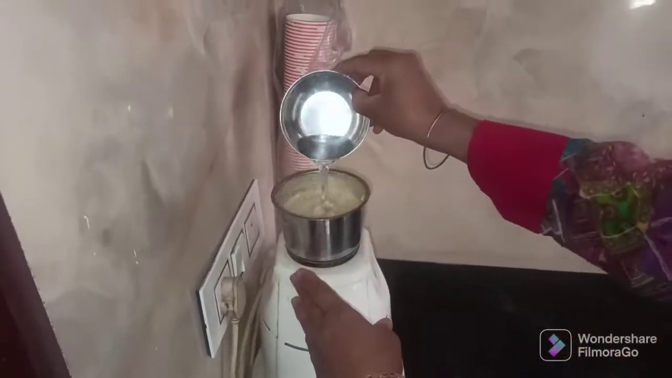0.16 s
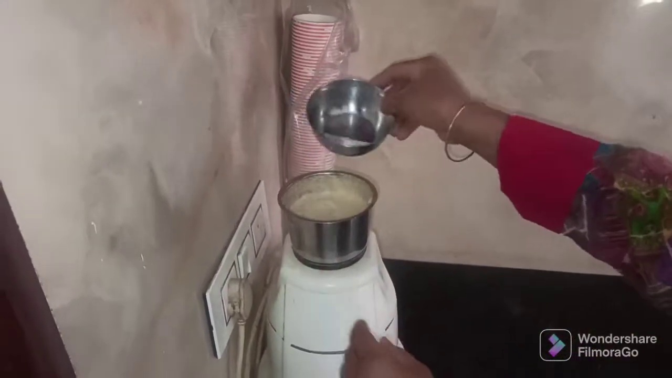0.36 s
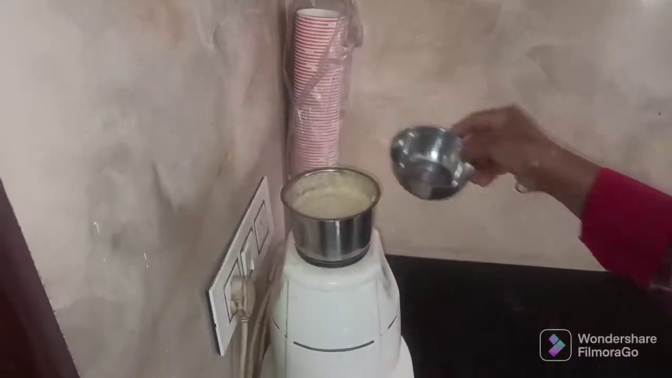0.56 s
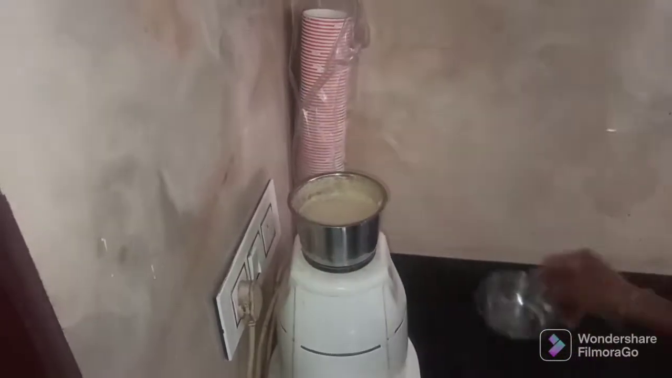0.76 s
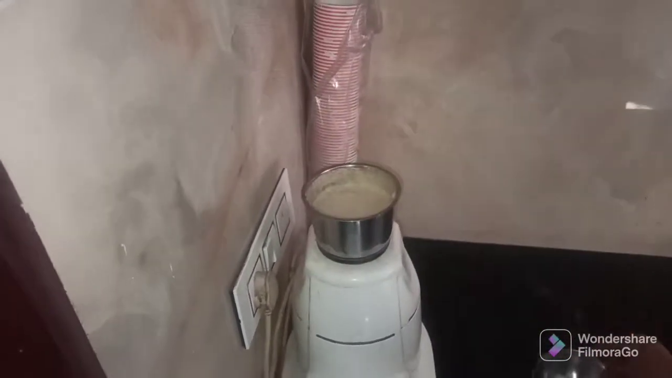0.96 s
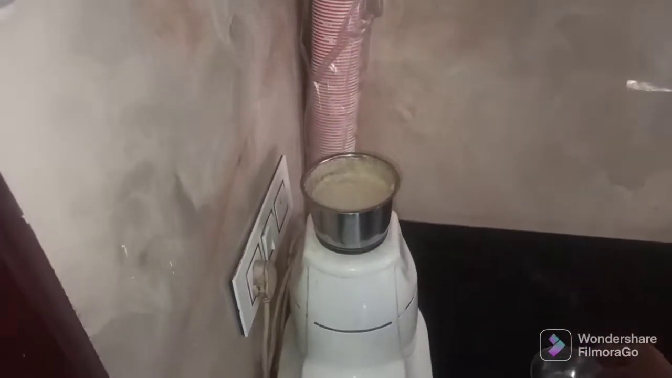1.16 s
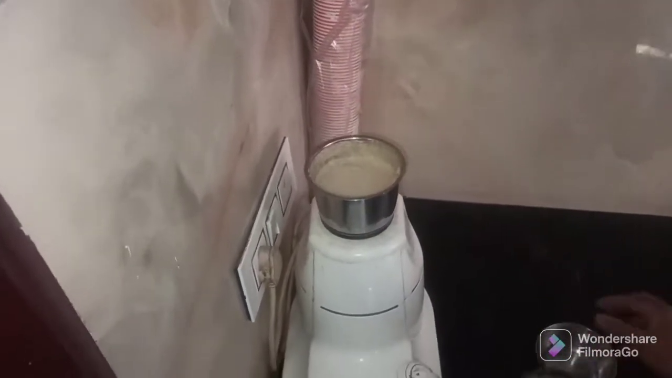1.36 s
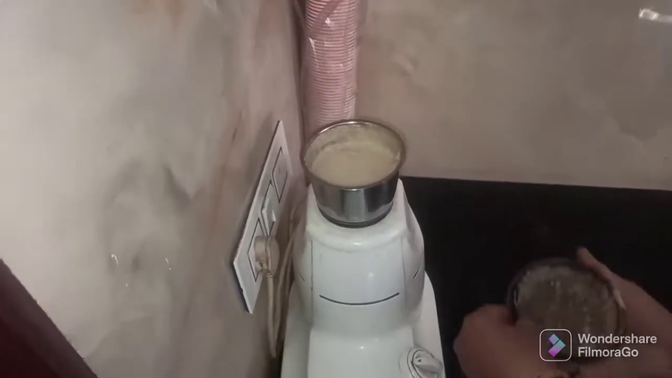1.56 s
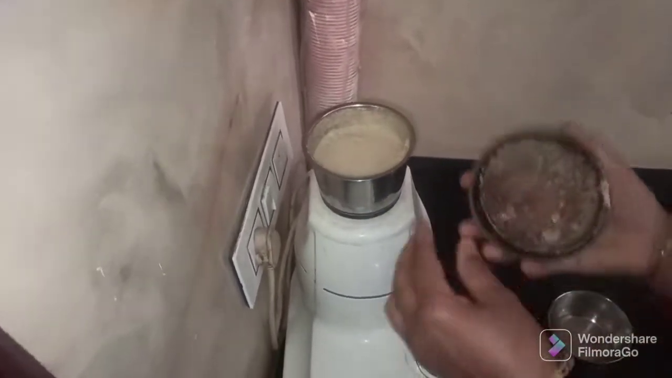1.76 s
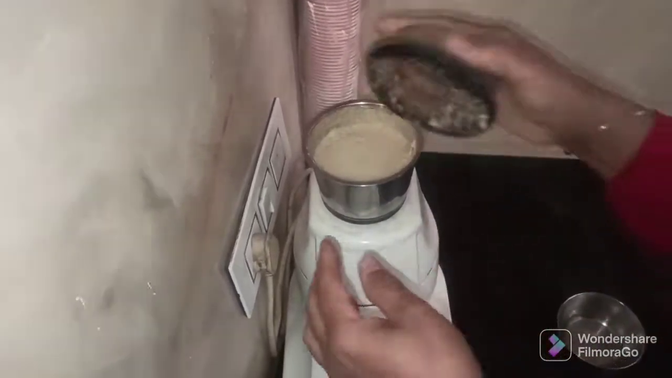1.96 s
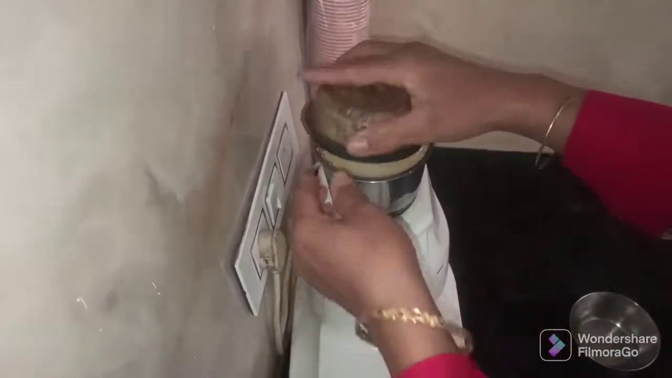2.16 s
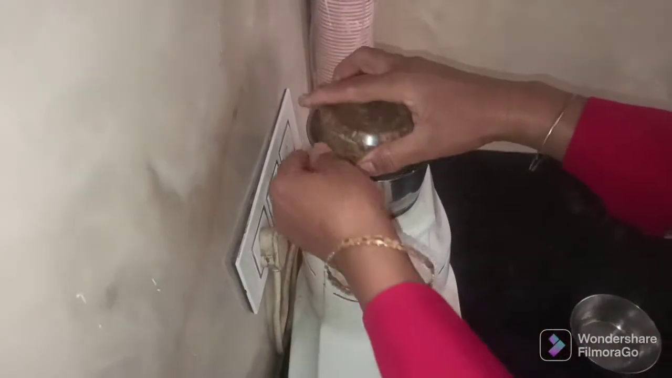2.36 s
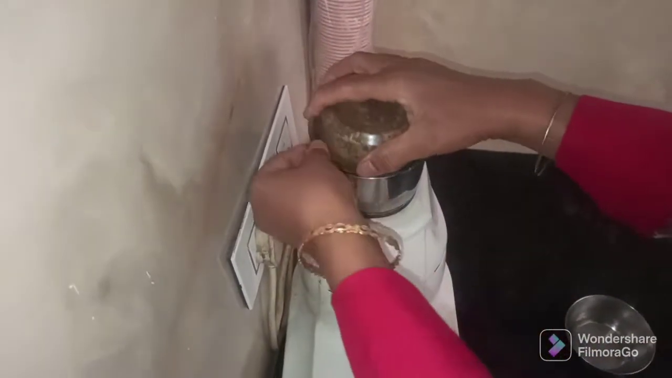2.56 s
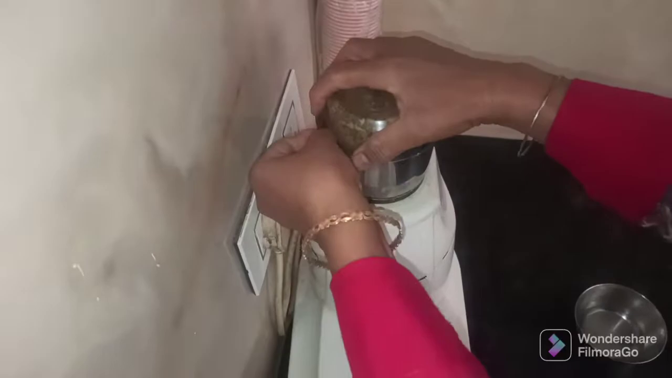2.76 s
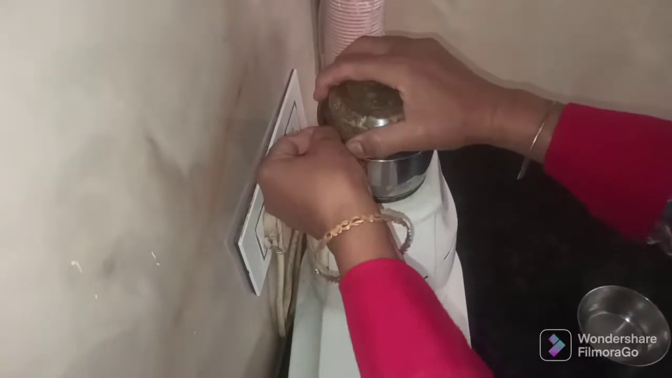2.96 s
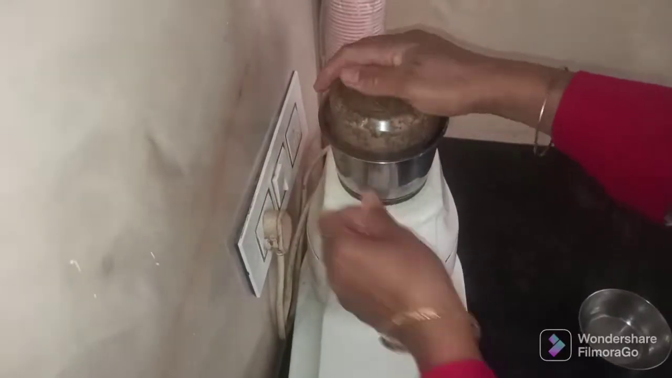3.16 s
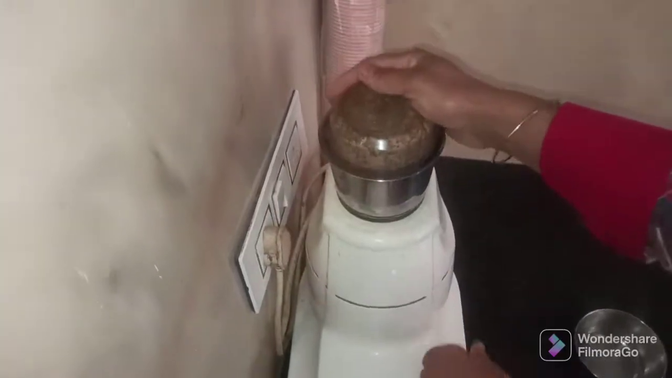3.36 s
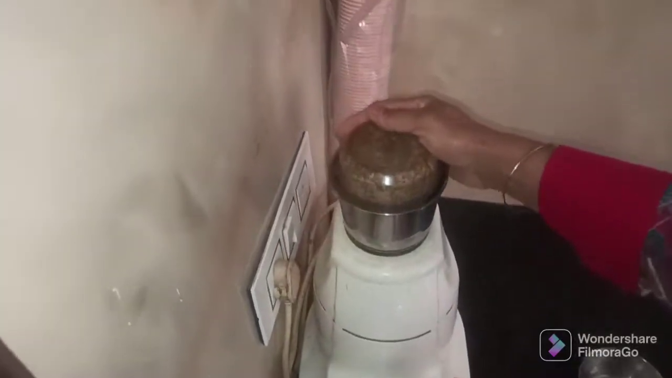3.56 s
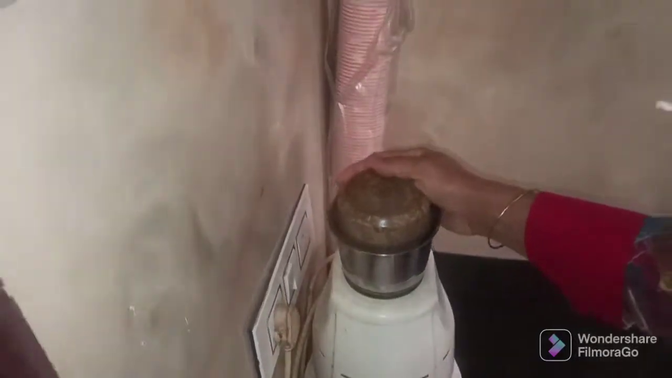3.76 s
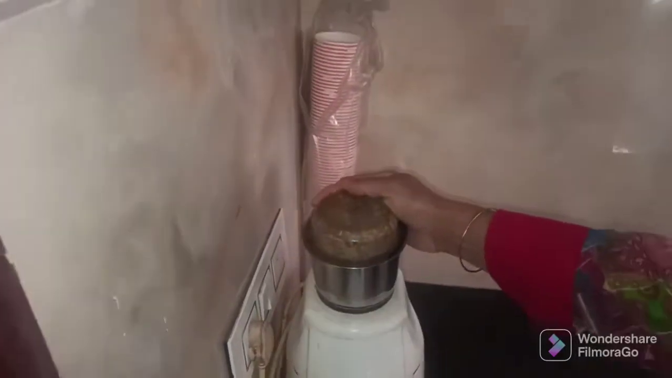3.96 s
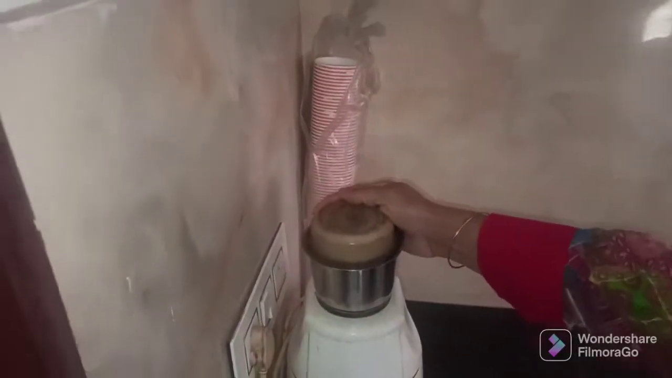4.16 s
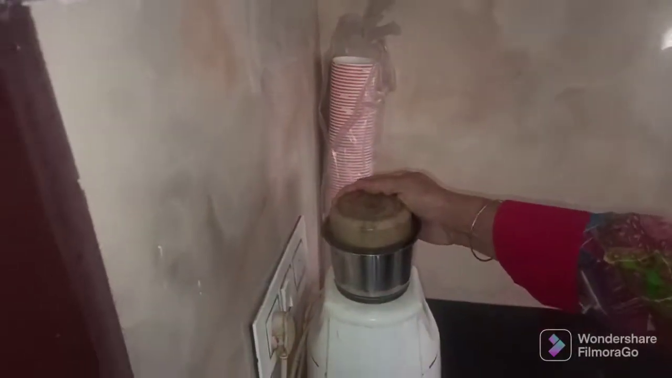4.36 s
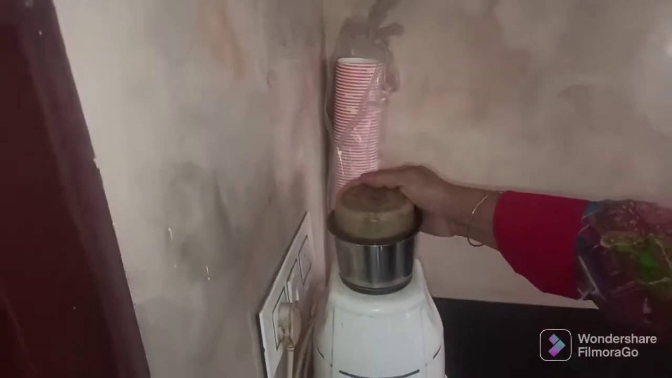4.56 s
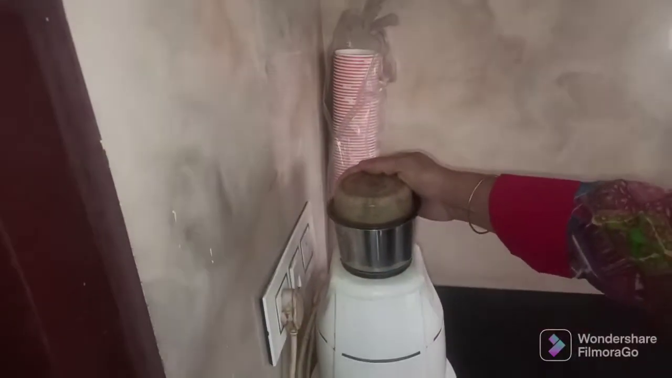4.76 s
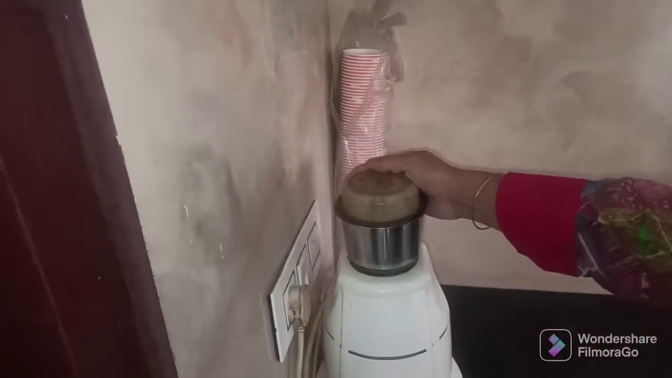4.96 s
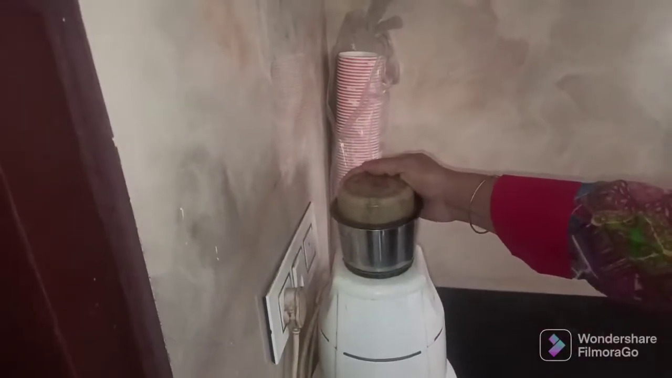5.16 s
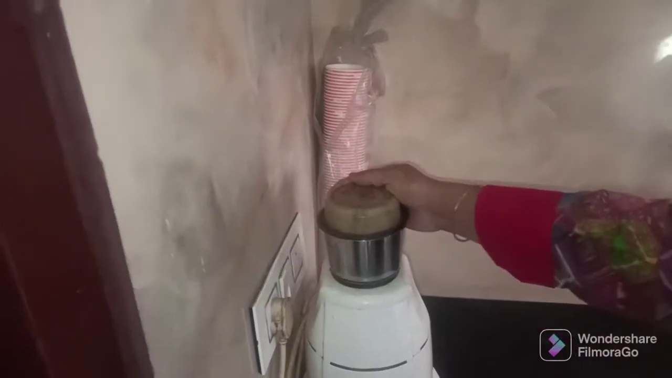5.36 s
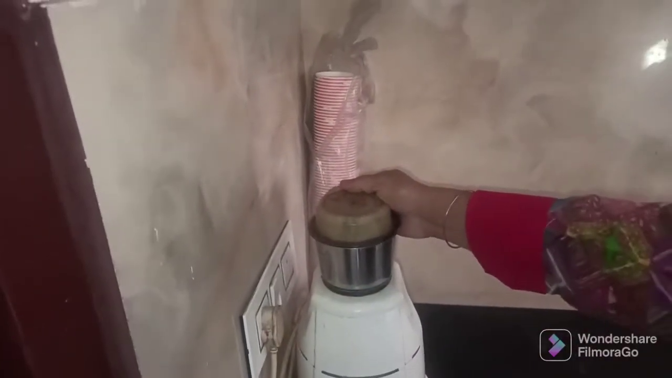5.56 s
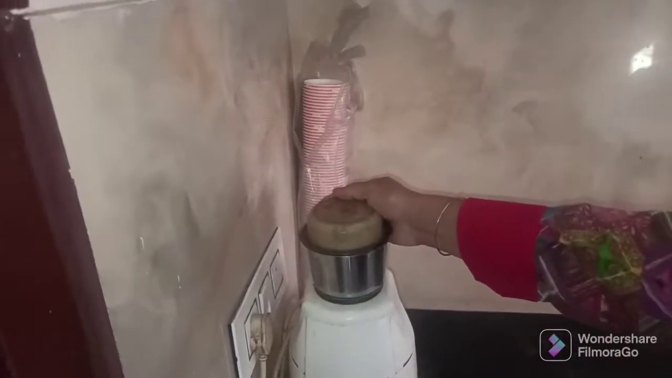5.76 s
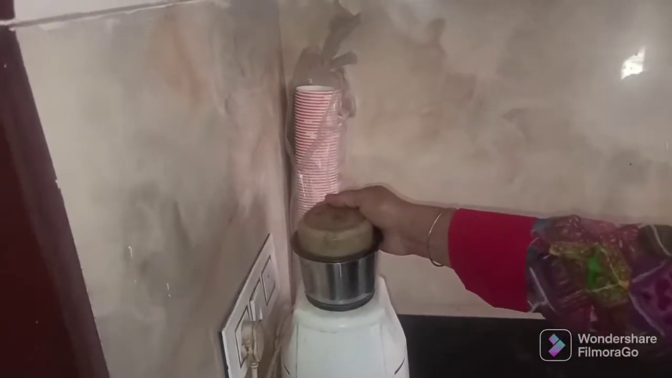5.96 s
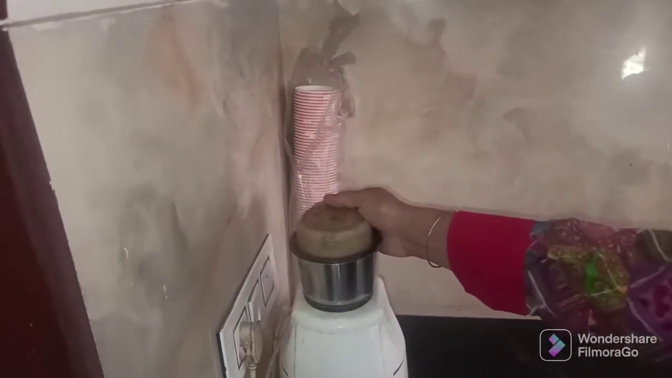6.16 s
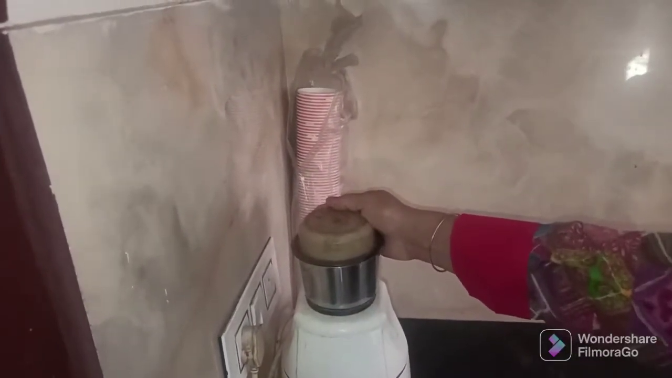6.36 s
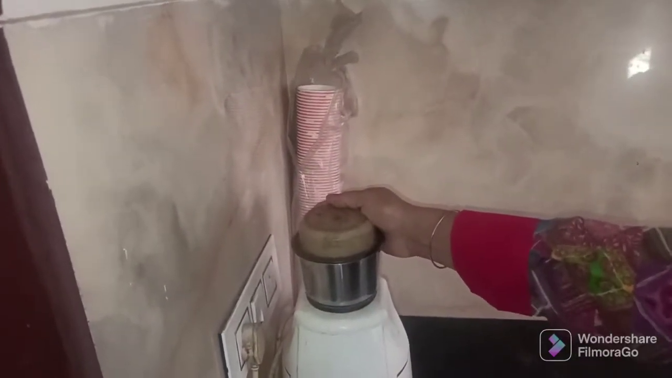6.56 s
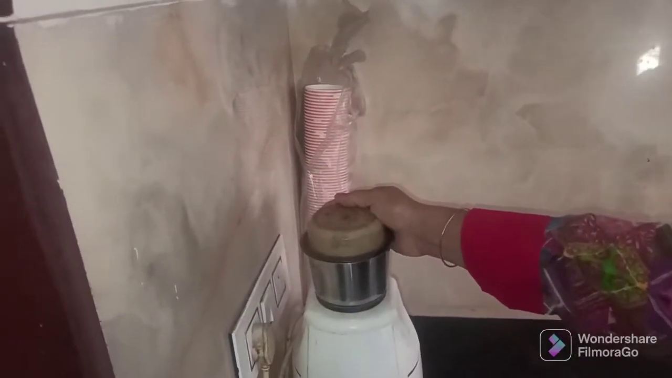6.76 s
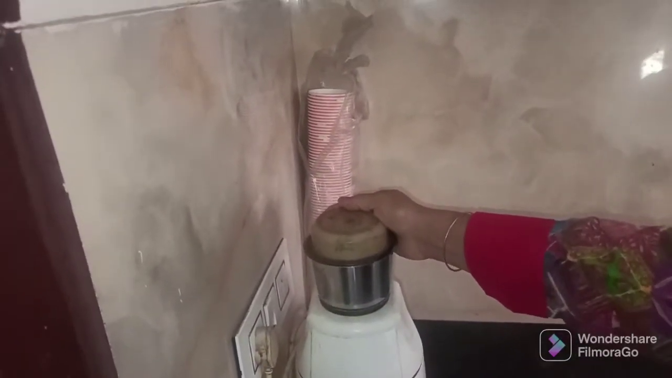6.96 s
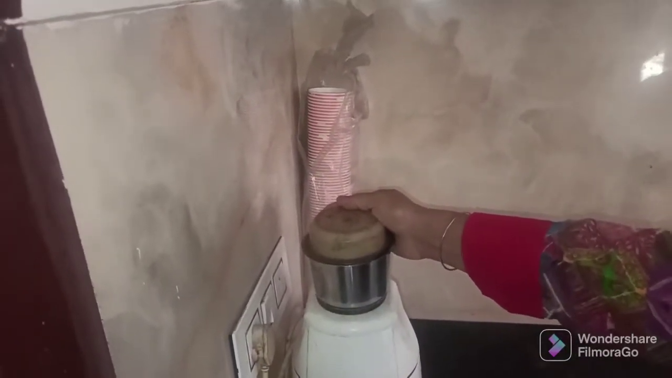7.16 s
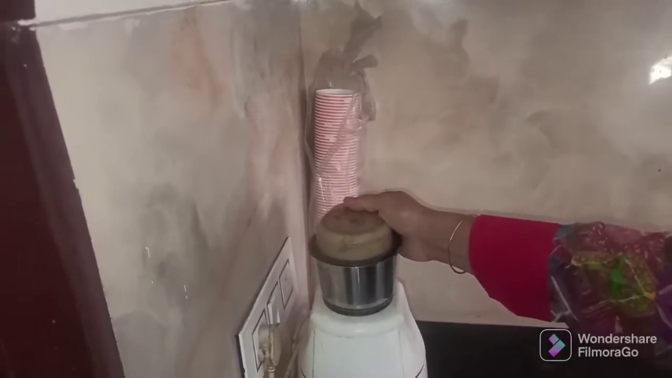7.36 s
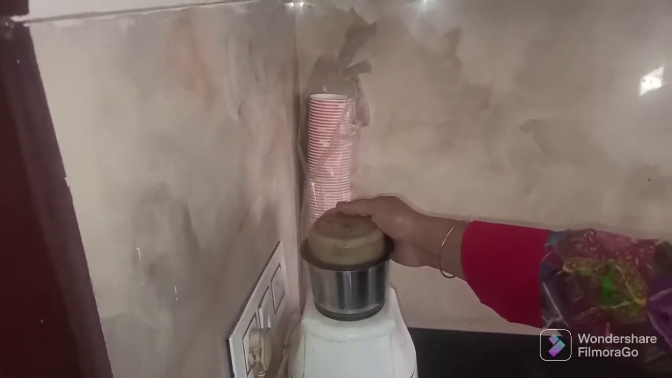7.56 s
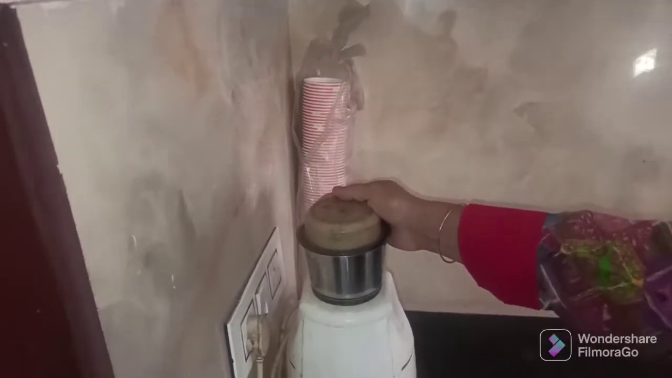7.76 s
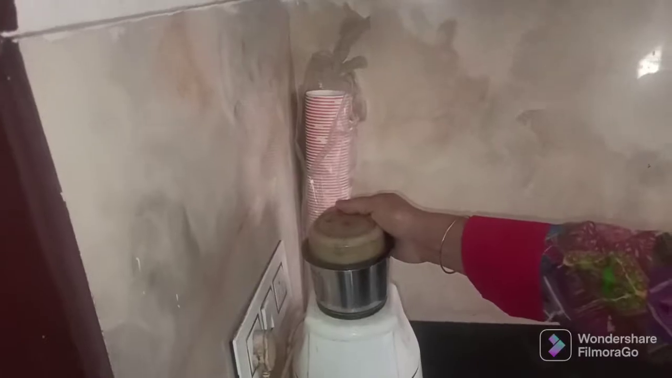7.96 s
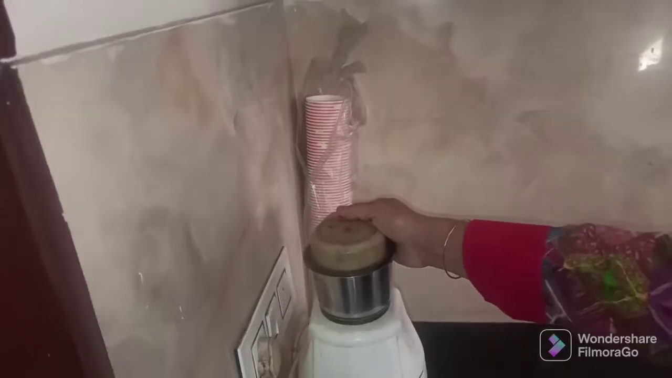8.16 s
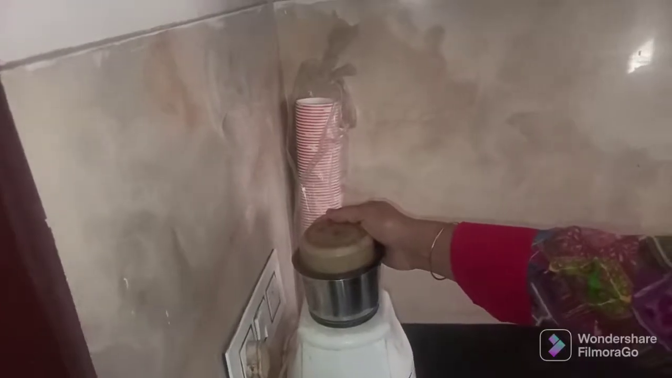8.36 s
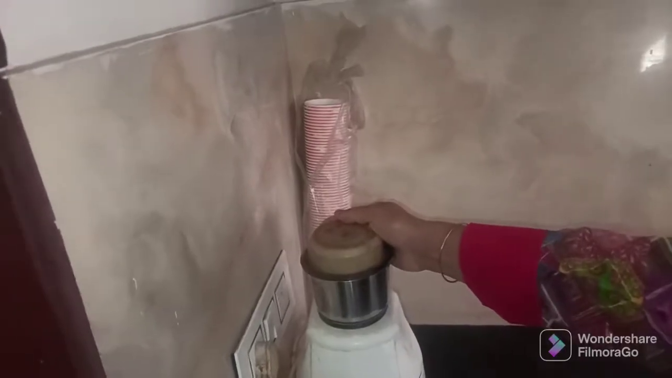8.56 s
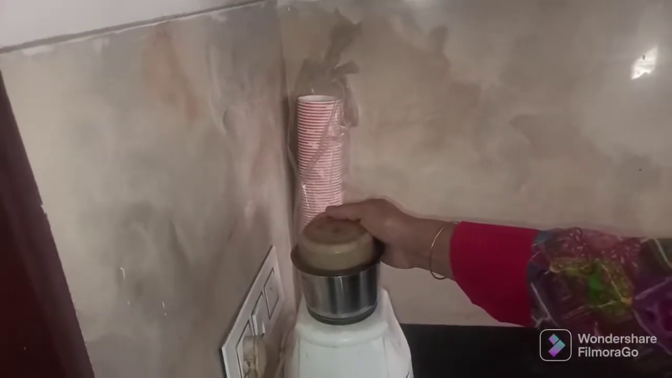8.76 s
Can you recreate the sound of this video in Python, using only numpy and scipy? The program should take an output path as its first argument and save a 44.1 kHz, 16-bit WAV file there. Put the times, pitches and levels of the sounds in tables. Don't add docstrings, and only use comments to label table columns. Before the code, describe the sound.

A small reflective kitchen heard close on a hand-held stereo phone. From 0 to 1 s there is a low fridge hum with faint air, soft skin rubs and a few tiny bright ticks. At 1.08 s a steel bowl is set on a stone counter: a sharp clank, three quick rocks by 1.15 s, and a bright beating ring that is soon damped, leaving a faint tail. Quiet rubbing follows. From 2.27 s a lid knocks the jar, with the firmest dull thump at 2.5 s, then light thuds, rubs and clicks until 3.9 s, with a brief knob creak at 3.6-3.74 s. At 3.94 s a switch snaps and the motor surges with a hard, shuddering bite at 4.0 s and weaker bites to 4.2 s. The shaft slows slightly under load by 4.8 s. The loud grinder continues steadily to the end at about 8.8 s: churning paste, hollow jar resonances, low hum, brush hiss and a wavering whistle near 2.2 kHz that swells irregularly, looser after 5.6 s.

```python
import sys
import numpy as np
from scipy import signal
from scipy.fft import rfft, irfft, next_fast_len
from scipy.io import wavfile
from scipy.ndimage import uniform_filter1d

SR = 44100
rng = np.random.default_rng(int(sys.argv[2]) if len(sys.argv) > 2 else 0)


def wrap_up_sound(samples):
    columns = np.atleast_2d(samples).T
    tamed = np.clip(columns, -1, 1)
    steps = np.round(tamed * 32767).astype(np.int16)
    wavfile.write(sys.argv[1], SR, steps)


def rack_gain(trim_db):
    fader = np.asarray(trim_db, float)
    return 10 ** (fader / 20)


N = 388080
TIME = np.arange(N) / SR
MAINS = 2 * np.pi * 100 * TIME


def shape(x, table):
    hz, db = np.transpose(table)
    size = next_fast_len(N + 8192)
    f = np.arange(size // 2 + 1) * SR / size + 1
    gain = rack_gain(np.interp(np.log(f), np.log(hz), db))
    return irfft(rfft(x, size) * gain, size)[..., :N]


def unit(x):
    return x / np.sqrt(np.mean(x ** 2))


# (frequency [Hz], coherence [0-1])
ALIKENESS = [(60, 0.93), (130, 0.97), (290, 0.95), (640, 0.8), (1410, 0.58), (3100, 0.52), (6820, 0.3),
             (15000, 0.12)]


def wide_noise():
    mid, side = rng.standard_normal((2, N))
    alike = [(hz, np.clip(c, 0, .99)) for hz, c in ALIKENESS]
    mid = shape(mid, [(hz, 10 * np.log10(1 + c)) for hz, c in alike])
    side = shape(side, [(hz, 10 * np.log10(1 - c)) for hz, c in alike])
    return np.array([mid + side, mid - side]) / 2


def curves(table):
    s, *columns = np.transpose(table)
    return [np.interp(TIME, s, c, left=-120, right=c[-1]) for c in columns]


def walk(rate):
    hold = int(SR / rate)
    steps = np.repeat(rng.standard_normal(N // hold + 1), hold)
    return unit(uniform_filter1d(uniform_filter1d(steps, hold), hold)[:N])


def ring(x, hz, t60):
    r, w = np.exp(-np.log(1000) / (t60 * SR)), 2 * np.pi * hz / SR
    return signal.lfilter([0, r * np.sin(w)], [1, -2 * r * np.cos(w), r * r], x)


def burst(s, db, decay_s):
    return rack_gain(db) * (TIME >= s) * np.exp(-np.clip(TIME - s, 0, 1) / decay_s)


def swell(s, db, rise_s, fall_s, order=1):
    span = np.where(TIME < s, max(rise_s, .002), max(fall_s, .002))
    return rack_gain(db) * np.exp(-(np.abs(TIME - s) / span) ** order)


def strand(hz, width_hz, alike):
    drive = rng.standard_normal((3, N)) + 1j * rng.standard_normal((3, N))
    poles = [np.exp(-1.5 * np.pi * width_hz / SR)] * 2
    slow = signal.lfilter([1], np.poly(poles), drive[:2] + alike * drive[2])
    carrier = np.exp(2j * np.pi * np.cumsum(np.clip(hz, 100, 5000)) / SR)
    return unit((slow * carrier).real)


# (time [s], level [dB])
FRIDGE_LEVEL = [(0, -37.5), (1.45, -40.5), (2.25, -51), (3.1, -52.5), (3.9, -44.5), (8.8, -43)]
# (frequency [Hz], level [dB])
FRIDGE_TONES = [(70.0, -56.5), (140.0, -47.5), (279.9, -71.5)]
# (frequency [Hz], level [dB])
AIR_COLOUR = [(15, -55.5), (25, -19.5), (87, -0.5), (113, 2.5), (140, -10), (167, -30), (194, -10.5),
              (276, -10), (1360, -26), (4600, -36.5), (5980, -80), (10100, -120)]


def kitchen():
    top = max(db for _, db in FRIDGE_TONES)
    hum = sum(rack_gain(db - top + 0.63 * walk(1.2)) * np.sin(2 * np.pi * hz * TIME) for hz, db in FRIDGE_TONES)
    rumble = unit(shape(wide_noise(), AIR_COLOUR)) * rack_gain(-57 + 0.9 * walk(0.62))
    hiss = unit(shape(wide_noise(), [(1500, -24), (4000, 2), (8000, -12.0), (16000, -14.5)])) * rack_gain(-73)
    return hum * rack_gain(curves(FRIDGE_LEVEL)[0] - 4.5) + rumble + hiss


# (frequency [Hz], level [dB])
SKIN_COLOUR = [(1200, -7.5), (2500, -7), (4000, 2), (5400, 9), (7000, -0.5), (12000, -9), (16000, -11)]
# (time [s], half length [s], bright level [dB], dull level [dB], squeak pitch [Hz])
RUBS = [(0.03, 0.064, -58.5, -63, 4300), (0.126, 0.052, -54.5, -57, 4620), (0.382, 0.21, -76, -66, 6800),
        (0.628, 0.049, -79, -70, 3500), (0.906, 0.013, -71, -72.5, 3000), (1.55, 0.31, -78, -73, 3770),
        (1.797, 0.19, -75.5, -71, 4016), (1.942, 0.029, -69, -76, 4270), (2.149, 0.07, -66, -63.5, 3800),
        (2.305, 0.06, -84.5, -54, 1510), (2.517, 0.0095, -65, -43, 4000), (2.714, 0.025, -61, -59, 1700),
        (2.74, 0.02, -50, -52, 3100), (2.786, 0.032, -77, -59, 3100), (2.949, 0.074, -59, -52.5, 4350),
        (3.167, 0.063, -61.5, -64, 7140), (3.305, 0.087, -58, -76, 6740), (3.36, 0.074, -63, -76, 3930),
        (3.483, 0.055, -65, -55, 4000), (3.655, 0.11, -62, -54, 2400), (3.934, 0.018, -60, -55, 4000)]


def rubbing():
    out = np.zeros((2, N))
    strokes = [swell(s, db, 0.87 * half, half, order=3) for s, half, db, *_ in RUBS]
    bright = rack_gain(-78.5) + sum(strokes)
    dull = rack_gain(-75.0) + sum(swell(s, db, 0.78 * 0.87 * half, half, order=2) for s, half, _, db, _ in RUBS)
    rumble = rack_gain(np.where(TIME < 1.4, -72.5, -61.5) + 3.6 * walk(7.8))
    rumble = rumble + swell(LID_KNOCKS[4][0], -51, .015, 0.078)
    grain = wide_noise() * rack_gain(2.5 * walk(350)) * (TIME < SWITCH_SNAP[0][0])
    out += unit(shape(grain, SKIN_COLOUR)) * bright
    half_n = N // 2
    for stroke, (*_, hz) in zip(strokes, RUBS):
        out[:, :half_n] += rack_gain(-1.5) * unit(ring(grain[:, :half_n], hz, 0.0043)) * stroke[:half_n]
    cloth = shape(grain, [(150, 10.0), (350, 8.0), (700, 2.5), (1500, -25.0), (3000, -52)])
    grip = shape(grain, [(25, -41), (55, -4.0), (90, 7), (130, -17.0), (300, -50)])
    return out + unit(cloth) * dull * rack_gain(-0.5) + unit(grip) * rumble * rack_gain(3.0)


# (time [s], level [dB], pitch [Hz], lid ring level [dB])
LID_KNOCKS = [(0.119, -41, 145, 4.5), (2.267, -31, 301, 3), (2.332, -30, 330, -2), (2.389, -37, 252, -19),
              (2.51, -29.5, 303, -8), (2.516, -19.5, 125, -26), (2.535, -37, 171, -14),
              (2.549, -31, 150, -7), (2.57, -41, 160, -12), (2.591, -34, 129, -23), (2.715, -41, 500, -5),
              (2.74, -42, 500, 9), (2.8, -40, 124, -2), (2.91, -37.5, 550, -3), (2.935, -38, 228, -10),
              (3.226, -40.5, 250, 2), (3.28, -41, 280, -8), (3.429, -33, 102, -5), (3.473, -37.5, 204, 3),
              (3.52, -44, 217, 7), (3.575, -42, 144, 2), (3.689, -43, 222, -11), (3.755, -37, 260, -20),
              (3.772, -41.5, 137, 4), (3.801, -46, 250, -20), (3.84, -43, 242, -20), (3.885, -47, 250, -20)]


def knocks():
    out, t = np.zeros((2, N)), TIME[:SR // 4]
    for s, db, hz, bright_db in LID_KNOCKS:
        push = np.sin(2 * np.pi * hz * t) * (t < .5 / hz) * 4 * hz / SR
        thud = ring(push, hz, 0.052)
        edge = np.exp(-t / 0.0003) * (1 + .5 * rng.standard_normal((2, len(t))))
        lid = 0.052 * ring(edge, 643, 0.053) + 0.016 * ring(edge, 1130, 0.028)
        at = int(s * SR)
        out[:, at:at + len(t)] += rack_gain(db) * (thud + rack_gain(bright_db) * lid)
    return out


# (time [s], level [dB], centre [Hz], top treble level [dB])
SMALL_TICKS = [(0.245, -42, 4100, -69), (0.381, -37, 6700, -48), (0.414, -40, 7800, -46),
               (0.6922, -60.5, 3530, -57), (0.8958, -34.5, 3150, -64), (0.9094, -62, 3250, -68),
               (2.5132, -41.5, 6620, -71), (2.548, -33, 1200, -76), (2.7102, -36, 2890, -72),
               (2.737, -32, 3000, -68), (2.748, -34, 3100, -68), (2.915, -42, 4400, -84),
               (2.9023, -46, 4450, -76.5), (2.935, -40, 4450, -74), (3.228, -36, 2600, -70),
               (3.431, -40, 2000, -76), (3.471, -31, 3000, -74), (3.511, -30, 1200, -76),
               (3.6017, -48, 2230, -78), (3.635, -37, 2500, -75), (3.5767, -40, 2720, -76),
               (3.69, -32, 2290, -74), (3.722, -30, 1500, -76), (3.7724, -41, 3960, -72)]


def ticks():
    out, t = np.zeros((2, N)), TIME[:SR // 4]
    for s, db, hz, top_db in SMALL_TICKS:
        click = np.exp(-t / 0.0053) * rng.standard_normal((2, len(t)))
        at = int(s * SR)
        out[:, at:at + len(t)] += rack_gain(db - 12.5) * ring(click, hz, 0.00067)
        out[:, at:at + len(t)] += rack_gain(top_db + 2) * ring(click, 14000, 0.00065)
    return out


def knob_creak():
    slips = np.zeros(N)
    at = np.arange(3.6, 3.74, 1 / 78)
    uneven = at + .0015 * rng.standard_normal(len(at))
    slips[(uneven * SR).astype(int)] = rack_gain(-52 + 2.8 * rng.standard_normal(len(at)))
    low = 2.0 * ring(slips, 620, 0.036) + 2.0 * ring(slips, 2800, 0.0054)
    return low + .6 * ring(slips, 4200, .003) + .4 * ring(slips, 6800, .002)


def hands():
    out = rubbing() + knocks() + ticks() + knob_creak()
    out[0] = np.roll(out[0], 3)
    return out


BOWL_PITCHES = [1265, 1523, 2417, 2546, 2945, 3984, 4377, 5050, 5965, 6503, 7025, 7273, 7752, 8339, 11750,
                12270, 13030, 14040, 14700]
# (landing level [dB], rocking level [dB], decay t60 [s], split of the pair [Hz], partner's t60 [s])
BOWL_MODES = [(-22.5, -50, 0.16, 4, .16), (-25, -70.5, 0.12, 4.1, 0.091), (-27, -45, 0.77, 13, .3),
              (-18, -25.5, 0.95, 26, 0.56), (-32.5, -42, 0.059, 50, .08), (-22.5, -20, 0.3, 16.4, 0.93),
              (-47, -35, .05, 20, .05), (-38, -30, 0.06, 24, 0.34), (-31.5, -26.5, 0.57, 35, 0.37),
              (-50, -49.5, 0.05, 20, .05), (-43, -36, 0.15, 39, 0.19), (-42, -42, 0.45, 12.5, .2),
              (-47, -56, .1, 30.3, .1), (-22.5, -27, 0.12, 15, 0.49), (-67, -70.5, .2, 30, .2),
              (-45, -48, .2, 90, .1), (-38, -45, .2, 120, .1), (-41.5, -47.5, .16, 150, .1),
              (-49, -55, .05, 200, .06)]
# (time [s], level [dB])
RIM_ROCKS = [
    (1.12, 3),
    (1.132, -7),
    (1.143, 4),
    (1.188, -52),
    (1.225, -16),
]
# (time [s], level [dB])
RING_FREEDOM = [(1.08, 7), (1.11, -1), (1.145, 6.5), (1.156, 2.5), (1.166, -14), (1.225, -6), (1.243, -27),
                (1.265, -16), (1.3, -17), (2.0, -9)]


def bowl():
    lands_s, span = 1.081, 2 * SR
    rings, land, rock = np.zeros(N), np.zeros(span), np.zeros(span)
    land[int(lands_s * SR)] = 1
    for s, db in RIM_ROCKS:
        rock[int(s * SR)] = rack_gain(db)
    freedom_db = np.clip(curves(RING_FREEDOM)[0][:span], -30, 12)
    rocking = np.clip((TIME[:span] - 1.16) / 0.041, 0, 1)
    for hz, (land_db, rock_db, t60, split_hz, partner_t60) in zip(BOWL_PITCHES, BOWL_MODES):
        push = rack_gain(land_db) * land + rack_gain(rock_db) * rock
        pair = ring(push, hz, t60) - 0.52 * ring(push, hz - split_hz, partner_t60)
        pair *= rack_gain((freedom_db + 7.5) * min(1, (hz / 2400) ** 2) - 6.5)
        rings[:span] += pair * rack_gain(walk(34.9)[:span] * rocking)
    tip = 1. * (np.arange(N) == int(RIM_ROCKS[0][0] * SR))
    deep_hz, deep_t60 = 1526, .78
    rings += rack_gain(-26.5) * (ring(tip, deep_hz, deep_t60) - .8 * ring(tip, deep_hz - 4.5, deep_t60))
    crack = burst(lands_s, -20, 0.004) + sum(burst(s, db - 33, 0.006) for s, db in RIM_ROCKS)
    crack = crack + burst(1.085, -33, .09) + swell(1.14, -36, .02, .02)
    stone = [(200, -17), (600, 4.0), (2000, 5.5), (5000, -1.5), (8000, -10), (8800, -48.5)]
    stone += [(11400, -46.5), (12000, -19.5), (14400, -19), (14900, -31)]
    scrape = unit(shape(wide_noise(), stone)) * crack
    return np.array([np.roll(rings, 8) * rack_gain(2.0), rings * rack_gain(-2.0)]) + scrape


# (time [s], level [dB])
SWITCH_SNAP = [
    (3.939, -3),
]


def switch_snap():
    envelopes = [burst(s, db - 6, 0.0049) + burst(s, db - 20.5, 0.027) for s, db in SWITCH_SNAP]
    return sum(envelope * rng.standard_normal((2, N)) for envelope in envelopes)


# (frequency [Hz], level [dB])
BRUSH_COLOUR = [(1200, -33), (2400, -7.5), (3200, -4), (4300, -1.5), (6500, 1), (7500, -0.5), (12000, -4),
                (16000, -7.5)]


def brush_hiss(turn, since):
    gate = 1 + .09 * np.cos(turn) + .04 * np.cos(MAINS)
    sparks = wide_noise() * gate * rack_gain(0.36 * walk(18) + 1.15 * walk(150))
    return unit(shape(sparks, BRUSH_COLOUR)) * (1 - np.exp(-since / 0.053)) * rack_gain(-16.5)


# (time [s], churn level [dB], housing shudder level [dB])
BITES = [
    (4.012, -19, -13),
    (4.07, -41, -30),
    (4.125, -25, -36),
    (4.185, -22.5, -30),
]


def housing_shudder(lumps, on):
    body = unit(ring(lumps, 223.0, 0.19)) + 0.36 * unit(ring(lumps, 353, 0.05))
    body = body + 0.52 * unit(ring(lumps, 652, 0.08)) + .4 * unit(ring(lumps, 966, .04))
    return unit(body) * on * sum(swell(s, db, 0.047, 0.015) for s, _, db in BITES)


def mains_hum(shaft_db, whirl, on):
    steady = whirl * rack_gain(-40 - 0.92 * np.clip(shaft_db + 38, 0, 20) + 2.0 * walk(2))
    inrush = on * swell(BITES[0][0], -15.5, 0.08, 0.043)
    return (steady + inrush) * np.sin(MAINS)


# (frequency [Hz], width [Hz], level [dB])
JAR_MODES = [(212, 25, -26), (304, 3.3, 6), (387, 35, 8), (464, 15, 1), (624, 80, 5.5), (727, 33, 2),
             (1058, 55, 3), (1230, 28, 5), (1460, 110, 12), (1860, 39, -5.5)]
# (frequency [Hz], level [dB])
PASTE_COLOUR = [(60, -67), (160, -21), (200, -0.5), (700, 8), (1400, 2), (1650, 5), (2600, -0.5),
                (4500, -18.5)]


def churning_paste(lumps, on):
    load = on * (rack_gain(-22.5 + 0.34 * walk(9)) + sum(swell(s, db, 0.05, 0.062) for s, db, _ in BITES))
    jar = sum(rack_gain(db + 2.5 * walk(5)) * unit(ring(lumps, hz, 2.5 / width)) for hz, width, db in JAR_MODES)
    splash = unit(shape(lumps, PASTE_COLOUR))
    return unit(unit(jar) + rack_gain(6.0) * splash) * load


def air_pockets(since, thin):
    low_hz = 655 + (8 + 20 * thin) * walk(25) + 42.16 * (1 - thin)
    high_hz = 917 + (8 + 10 * thin) * walk(25)
    trade = walk(4.8)
    low_db = -31 + 1.2 * trade + 3.5 * (1 - thin)
    high_db = -30.5 - 1.5 * trade - 5.0 * (1 - thin)
    low = strand(low_hz, 32, 1.6) * rack_gain(low_db) * np.clip((since - .45) / .25, .3, 1)
    high = strand(high_hz, 22, 1.3) * rack_gain(high_db - 1.5)
    moan = strand(291 + 4.1 * walk(3), 8.0, 8.6) * swell(6.06, -31.0, 1.0, 0.36)
    return low + high + moan


# (time [s], frequency [Hz])
WHISTLE_PITCH = [(4.0, 2200), (4.4, 2218), (5.0, 2195), (5.6, 2182), (6.15, 2192), (6.5, 2183), (7.2, 2180),
                 (7.48, 2162), (7.65, 2216), (7.85, 2192), (8.15, 2174), (8.36, 2183), (8.47, 2254),
                 (8.62, 2227), (8.8, 2230)]
# (time [s], level over its rest [dB])
PASTE_SLUMPS = [(4.08, -2.5), (4.16, 7), (4.28, 3.5), (4.4, 5.5), (4.541, 17), (4.76, 5.5), (4.96, 11.5),
                (5.07, 3.5), (5.26, 8.5), (5.35, 10.5), (5.55, 0.5), (5.83, 10), (6.15, 6.5), (6.3, 4.5),
                (6.55, 13), (6.8, -1.5), (7.01, 4), (7.13, 6), (7.39, 7), (7.669, 7.5), (7.8, 8),
                (8.03, 4.5), (8.21, 7), (8.38, 7), (8.55, -2.5), (8.66, 1), (8.789, 13)]


def jar_whistle(since, thin):
    slump = 3.0 + sum(swell(s, db, 0.035, 0.0699) for s, db in PASTE_SLUMPS)
    slump = np.clip((since - .06) / 0.14, 0, 1) * slump
    hz = np.interp(TIME, *np.transpose(WHISTLE_PITCH)) + 0.86 * 20 * np.log10(slump + .5)
    hz = hz - 95 * swell(4.158, 0, 0.022, 0.0291, order=2)
    hz = hz + (5 + 8 * thin) * walk(22)
    whistle = strand(hz, 30, 1.3) * rack_gain(2 * (1 - thin)) * (1 + .2 * np.cos(MAINS))
    whistle += rack_gain(-6.5 + 1.2 * walk(14)) * strand(hz - 102, 38, 0.86)
    whistle += rack_gain(-11.5 + 1.2 * walk(11)) * strand(hz + 98, 41, 1.0)
    whistle += rack_gain(-14 + 1.9 * walk(14)) * strand(hz - 200, 34, 0.52)
    return whistle * slump * rack_gain(-36.5)


# (time [s], turns per second [Hz], level [dB])
SHAFT_SPEED = [(4.2, 198.9, -38), (4.33, 196, -40), (4.45, 192, -31), (4.62, 185.9, -61), (4.78, 178, -37),
               (5.3, 177.3, -35.5), (5.95, 177.3, -35.5), (6.1, 178.7, -41), (7.1, 177.6, -39),
               (8.8, 179.3, -41.5)]


def shaft_turning():
    hz, db = curves(SHAFT_SPEED)
    uneven_hz = np.clip(hz, 150, 250) * (1 + 0.00304 * walk(12))
    return 2 * np.pi * np.cumsum(uneven_hz) / SR, db


# (multiple of the shaft speed, level [dB])
SHAFT_OVERTONES = [(1, -0.5), (2, -8), (6, -6.5), (8, -6)]


def shaft_hum(turn, shaft_db):
    rotor = sum(rack_gain(db + 2.7 * walk(6)) * np.sin(k * turn) for k, db in SHAFT_OVERTONES)
    beat = swell(4.33, -25, 0.081, 0.096, order=2) * (np.sin(3 * turn) + 0.81 * np.sin(5 * turn))
    return rotor * rack_gain(shaft_db + 3) + beat


# (frequency [Hz], phase [radians])
LEFT_LEAD = [(200, 0), (450, .5), (860, 1.0), (1890, .6), (2330, 1.0), (2670, -.3), (3190, 4.6),
             (5430, 14.8), (9470, 9), (16600, 25)]


def lead(x):
    hz, radians = np.transpose(LEFT_LEAD)
    f = np.arange(N // 2 + 1) * SR / N + 1
    turned = np.exp(1j * np.interp(np.log(f), np.log(hz), radians))
    return np.array([irfft(rfft(x[0]) * turned, N), x[1]])


def mixer():
    since = np.clip(TIME - SWITCH_SNAP[0][0], 0, None)
    on = (since > 0) * (1 - 0.69 * np.exp(-since / 0.065))
    whirl = np.clip((since - .1) / 0.34, 0, 1)
    thin = 1 / (1 + np.exp((5.6 - TIME) / .3))
    turn, shaft_db = shaft_turning()
    lumps = wide_noise() * rack_gain(1.73 * walk(60))
    steady = churning_paste(lumps, on) + air_pockets(since, thin) * whirl
    steady = steady + jar_whistle(since, thin) + brush_hiss(turn, since)
    hum = shaft_hum(turn, shaft_db) + mains_hum(shaft_db, whirl, on)
    return lead(steady) * (since > 0) + hum + housing_shudder(lumps, on) + switch_snap()


def room(x, db):
    t = TIME[:SR]
    tail = rng.standard_normal((2, SR)) * np.exp(-np.log(1000) * t / 0.62) * (t > .005)
    dull = signal.lfilter([.45], [1, -.55], tail)
    tail = dull + (tail - dull) * np.exp(-t / 0.048)
    wet = signal.fftconvolve(x[:, :4 * SR], tail * rack_gain(db) / np.sqrt(np.sum(tail[0] ** 2)), axes=1)
    return x + np.pad(wet, ((0, 0), (0, N)))[:, :N]


def scene():
    return room(bowl(), -9.5) + room(hands(), -8) + kitchen() + mixer()


# (frequency [Hz], level [dB])
SOUND_COLOUR = [(20, -28), (90, -8.5), (150, 1.5), (4600, 1), (4800, -8.5), (6050, -4.5), (6150, 2),
                (7650, 7.5), (7750, 1), (8500, 0.5), (8650, -10), (11500, -15.5), (11650, -2),
                (15750, -0.5), (15900, -61)]
# (frequency [Hz], left minus right level [dB])
PORT_TILT = [(60, -7), (110, -0.5), (200, 2.5), (380, -1.5), (700, -1.5), (1290, 5), (2380, -1), (4400, -2),
             (8120, 0.5), (15000, 1.5)]


def phone_ports(dry):
    left, right = shape(np.tanh(1.155 * dry) / 1.194, SOUND_COLOUR)
    left = shape(left, [(hz, db / 2) for hz, db in PORT_TILT])
    right = shape(right, [(hz, -db / 2) for hz, db in PORT_TILT])
    return np.array([left, right])


# (low edge [Hz], high edge [Hz], share of empty frames [0-1], share of
THINNED_BANDS = [(4800, 5100, .2, .65), (5100, 6000, .03, .45), (8650, 8950, .3, .8),
                 (8950, 9650, .72, .85), (9650, 10300, .12, .85), (10300, 11000, .1, .85),
                 (11000, 11550, .4, .85)]


def thin_treble(x):
    f, _, z = signal.stft(x, SR, "cosine", nperseg=2048)
    frames = z.shape[2]
    lines = np.repeat(rng.random((513, frames)), 2, axis=0)[:len(f)]
    for lo, hi, empty, lost in THINNED_BANDS:
        poor = np.repeat(rng.random(frames), rng.integers(1, 4, frames))[:frames] < empty
        inside = (f[:, None] > lo) & (f[:, None] < hi)
        gain = np.where(poor | (lines < lost), rack_gain(-60), (1 - lost) ** -.5)
        z = z * np.where(inside, gain, 1)
    return signal.istft(z, SR, "cosine", nperseg=2048)[1][:, :N]


def roll_off(x):
    return signal.sosfilt(signal.butter(12, 17030, fs=SR, output="sos"), x)


def record(dry):
    heard = thin_treble(phone_ports(dry))
    hiss_colour = [(6000, -29), (9000, 2.0), (15700, -6), (15900, -70)]
    hiss = rack_gain(-79.5) * shape(rng.standard_normal((2, N)), hiss_colour)
    return roll_off(heard + hiss)


dry = scene()
out = record(dry)
wrap_up_sound(out)
```